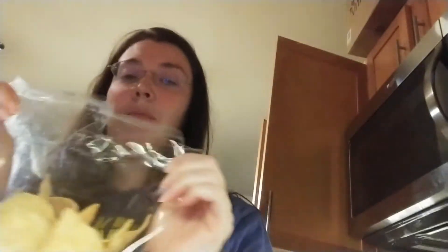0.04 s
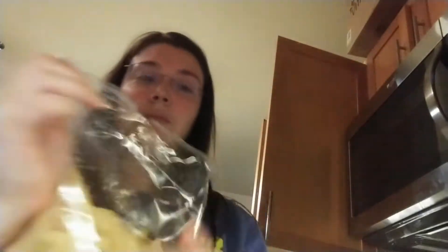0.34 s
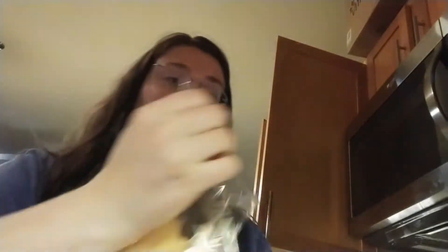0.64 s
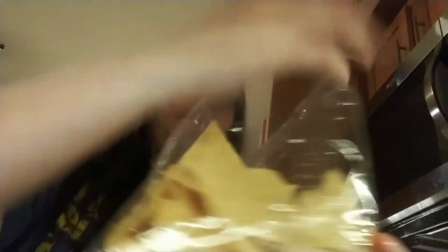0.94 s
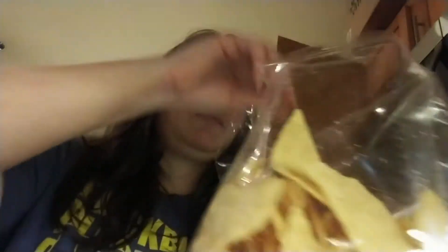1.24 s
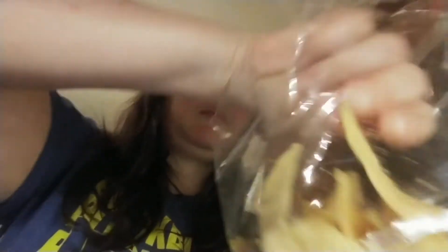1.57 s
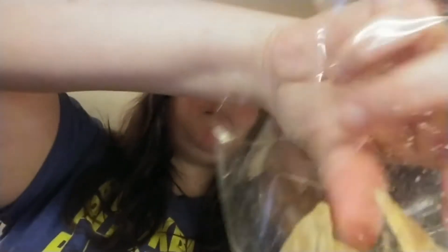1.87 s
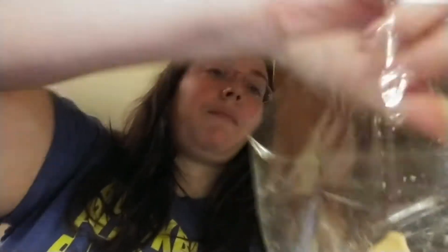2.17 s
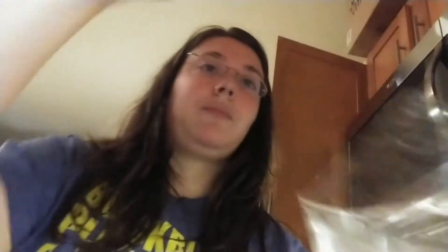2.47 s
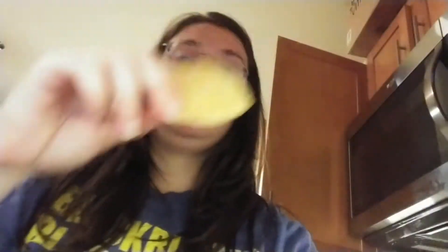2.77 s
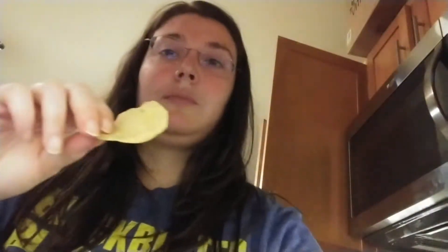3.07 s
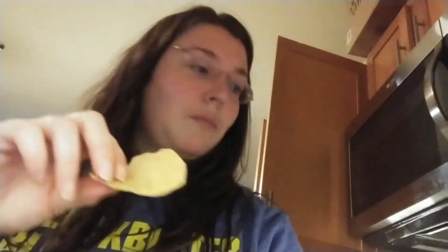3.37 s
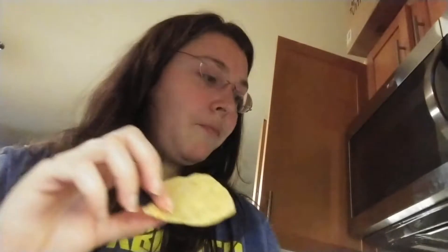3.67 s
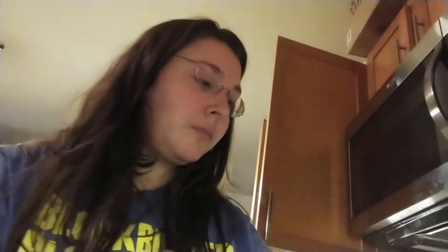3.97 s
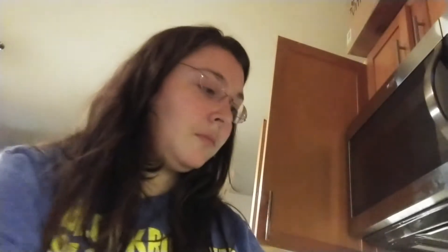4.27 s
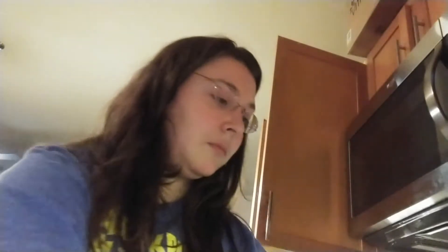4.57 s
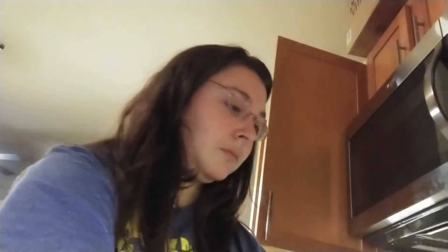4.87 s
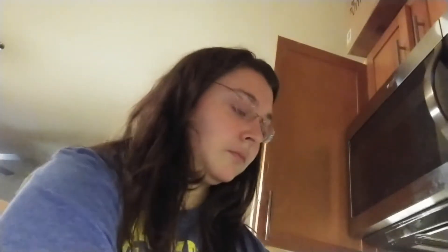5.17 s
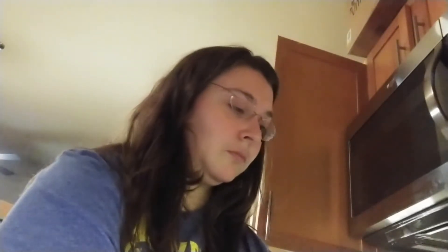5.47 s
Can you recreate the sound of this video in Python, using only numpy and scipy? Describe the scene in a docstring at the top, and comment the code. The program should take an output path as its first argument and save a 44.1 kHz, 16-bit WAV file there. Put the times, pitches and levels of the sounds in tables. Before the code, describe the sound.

A thin plastic bag of chips crinkles and crackles close by as a hand rummages inside, then a dull knock and light taps follow.

```python
"""A thin plastic bag of corn chips is pulled open close by: creases snap over a crackle of small folds.
A hand rummages inside, squeezing and bumping the bag so that it flaps and thumps, until about 3.5 s.
Near 3.9 s comes a dull knock in a soft rustle, then a few light taps further off, with one brief scrape.
A small kitchen answers throughout, over low air noise and a faint mains hum that sink towards the end."""
import sys
import numpy as np
from scipy import signal
from scipy.fft import rfft, irfft
from scipy.io import wavfile
from scipy.ndimage import uniform_filter1d

SR = 44100
rng = np.random.default_rng(int(sys.argv[2]) if len(sys.argv) > 2 else 0)


def master(y):
    """Save y as 16-bit WAV."""
    cut = np.clip(np.atleast_2d(y).T, -1, 1)
    pcm = np.round(cut * 32767)  # scale
    wavfile.write(sys.argv[1], SR, pcm.astype(np.int16))


N = 243873
T = np.arange(N) / SR
HUM_HZ, TOP_HZ = 119.7, 13300

# The loudest snaps of film and chips. Each row: start in seconds, relative level in dB, ring pitch in Hz,
# then ring boost, treble and bass in dB.
CREASE_SNAPS = [(0.0041, -22.5, 3800, 6, 3, -2.5), (0.0203, -30, 2400, 5, 4, -5),
                (0.0395, -27.5, 2410, 7, 6, -3), (0.0435, -27.5, 4500, 4, 7, -5),
                (0.0595, -20.5, 1980, 4.5, 0, -3), (0.073, -27, 1200, 5, 0, -4),
                (0.0776, -24, 1010, 9, -8, -3), (0.1237, -31.5, 4200, 4, 3, -3),
                (0.139, -27.5, 1100, 9, -8, -3), (0.1566, -28.5, 2200, 5, 3, -3),
                (0.1659, -31, 2200, 4, 4, -4), (0.175, -23.5, 1150, 6, 0, -4), (0.181, -26, 1900, 5, 2, -4),
                (0.1875, -25, 1700, 6, 2, -4), (0.192, -21, 1600, 7, -2, -4),
                (0.2205, -20.5, 1500, 3, -1, -3), (0.2523, -30, 1100, 6, -5, -3),
                (0.2957, -39, 2200, 4, -5, -2), (0.3378, -26.5, 1700, 6.5, -7, -4.5),
                (0.3402, -15, 2280, 10, -5, -1), (0.3565, -27, 2200, 5, -3, -5),
                (0.359, -22.5, 1100, 8, -11, -5), (0.3705, -28, 1200, 6, -6, -3),
                (0.378, -30, 3000, 3, -3, -3), (0.399, -31, 3200, 4, -6, -3),
                (0.433, -28.5, 5390, 5.5, -3.5, -2), (0.484, -22, 1220, 9, -8.5, 1),
                (0.4935, -25.5, 1020, 6.5, -4, -2.5), (0.5025, -27.5, 3780, 8, -7, -1.5),
                (0.5334, -24.5, 4200, 3, 6.5, -2), (0.5455, -27.5, 3980, 7, 1.5, -4),
                (0.579, -35, 1200, 4, 2, -4), (0.5875, -21.5, 1300, 2, 5, 0),
                (0.7228, -18, 1150, 10.5, 5, -3), (0.7554, -22.5, 4900, 6.5, 3, -4),
                (0.7877, -25, 2800, 4, 0, -3), (0.7995, -18.5, 1040, 8.5, 2.5, -1.5),
                (0.815, -21.5, 2450, 8, 3, -3.5), (0.8238, -18, 1100, 10, -0.5, -3),
                (0.8315, -24, 1200, 10.5, -7, -3), (0.8798, -24, 1070, 9.5, -16, -2),
                (0.9385, -29.5, 2200, 6, 6, -2.5), (0.951, -32, 4200, 5, 0, -2),
                (0.9726, -30.5, 6280, 5.5, -6, -1), (1.0006, -31, 6370, 5.5, -7.5, -1),
                (1.2955, -35, 2260, 4, 6, 0), (1.3075, -31.5, 1000, 5.5, -3.5, 1.5),
                (1.3141, -28.5, 1000, 6, -2, 1.5), (1.3575, -23.5, 5140, 9, 1, -2.5),
                (1.373, -28, 2900, 6, -4, -3), (1.382, -26, 4500, 4, 5.5, -2),
                (1.4092, -20, 850, 8.5, 2.5, 0), (1.4153, -16, 900, 4, -1.5, 3),
                (1.422, -14.5, 950, 7.5, 1.5, -1), (1.441, -17.5, 2500, 8, 0, -1),
                (1.4556, -18.5, 2304, 8.5, 7, -3), (1.4625, -23.5, 2400, 7.5, 5, -3),
                (1.484, -22.5, 900, 6, 3.5, -0.5), (1.563, -34, 4000, 3, -1, 1),
                (1.5933, -30, 2900, 4, -3, -1), (1.6135, -32, 2900, 5, 0, -4),
                (1.6266, -24.5, 910, 7, -11, 0), (1.6537, -23.5, 5000, 6.5, -3, 0),
                (1.6965, -26, 900, 5, -6, 3), (1.7018, -22, 2500, 4, -3, 4), (1.7105, -19.5, 2700, 4, 0, 2),
                (1.717, -18, 2600, 3, -3.5, 2), (1.7562, -12.5, 2650, 9, 2, 1),
                (1.7825, -18.5, 3700, 8, -6, -1.5), (1.8358, -28, 3720, 3, -7, 4),
                (1.943, -39, 3000, 5, 2, -2), (1.9591, -32, 2080, 6.5, 7.5, 1.5),
                (2.042, -33, 3000, 4, 2, -2), (2.0665, -23, 1100, 6.5, -3.5, 0.5),
                (2.079, -24.5, 2400, 6, -1, 0), (2.0844, -20, 750, 7, -3.5, 2.5),
                (2.1025, -17, 3500, 3, -1.5, 1.5), (2.1058, -15.5, 2410, 5, 0, 1.5),
                (2.115, -16, 2600, 2.5, 0, 2), (2.1305, -23.5, 1900, 7, -5.5, 2),
                (2.1687, -32, 4200, 5, 1, 0), (2.1943, -21, 1800, 5, 6.5, 5),
                (2.2095, -23.5, 2400, 4, 0, 3), (2.219, -25, 890, 5, -5.5, 3.5),
                (2.291, -27.5, 3080, 5.5, -7, 1), (2.3128, -37, 1700, 8, -2, 0),
                (2.405, -43, 1100, 5, -4, 0), (2.5009, -41, 984, 7.5, -10, 3),
                (2.5965, -38, 1014, 7, -8, 2), (2.6261, -41, 4200, 3, -3, 0), (2.667, -37, 2100, 8, -6, -2),
                (2.7027, -18, 4850, 9.5, 4, -3), (2.7585, -35, 900, 8, -5, 0),
                (2.7987, -26, 1100, 6, -6, -2), (2.8052, -21.5, 1240, 6.5, 0, -3),
                (2.817, -16, 2815, 4.5, 8, -2), (2.8265, -19.5, 560, 9.5, 3.5, -2),
                (2.8495, -24.5, 3600, 4, 0, -3), (2.8545, -24, 2500, 6, -2, -3),
                (2.8605, -16.5, 2500, 5, 5, -1), (2.8935, -23, 2700, 10, -3, -2),
                (2.9005, -15.5, 2250, 8, -5.5, 2.5), (2.934, -23, 2455, 7, -2, 0),
                (2.9445, -25, 4800, 6, 0, 0), (3.0005, -21, 2340, 6, 5, -1), (3.0173, -25, 2500, 5, 4, -2),
                (3.1021, -31, 4000, 2, 3, 0), (3.111, -30, 8000, 3, 4, 0), (3.124, -27, 4300, 6, 0, -1),
                (3.1415, -22.5, 2900, 5, -1, -1), (3.1895, -24, 1100, 5, 5, -2),
                (3.209, -24, 3800, 6, -3, 1), (3.214, -12.5, 3000, 6.5, -1, 1),
                (3.2225, -13.5, 2560, 6, 1.5, -3.5), (3.2248, -13.5, 2600, 7.5, 3, -3),
                (3.2325, -17, 3000, 3, 6.5, -1), (3.2465, -15.5, 800, 5, 3, -1),
                (3.2955, -25, 3140, 7, 0, -1), (3.4075, -34, 3580, 9, 4, 0), (3.465, -32, 1640, 8, 6, -2),
                (3.8657, -20, 1700, 5, 0, 4), (3.888, -24, 1300, 2, 3, 2)]
# Squeezes of the bag. Each row: peak time, time to swell by 20 dB and time to relax by 20 dB in seconds,
# then relative levels of crackle and of flapping in dB.
SQUEEZES = [(0.03, 0.3, 0.1942, -30.5, -53), (0.205, 0.24, 0.08, -24.5, -49),
            (0.3, 0.5, 0.22, -39.5, -53.5), (0.365, .04, 0.15, -27, -47.5), (0.5, 0.05, 0.106, -27, -52.5),
            (0.6, 0.09, 0.1, -28.5, -47.5), (0.735, 0.1, 0.14, -27.5, -45.5),
            (0.81, 0.18, 0.1667, -22, -43), (0.86, 0.1, 0.1667, -23.5, -42.5),
            (0.97, 0.24, 0.0144, -33.5, -47), (1.325, 0.025, 0.34, -31, -39.5),
            (1.43, 0.065, 0.19, -21, -32), (1.6, 0.08, 0.22, -33.5, -48.5),
            (1.705, 0.1147, 0.17, -24.5, -34.5), (1.81, 0.1181, 0.09, -32, -39.5),
            (1.99, 0.14, 0.27, -36, -50), (2.115, 0.1027, 0.09, -20.5, -29.5),
            (2.215, 0.06, 0.0505, -26.5, -28.5), (2.41, 0.25, 0.2, -50, -50), (2.52, 0.03, 0.5, -46, -53.5),
            (2.61, 0.05, 0.3, -44, -50), (2.71, 0.2576, 0.16, -38.5, -48.5),
            (2.825, 0.0858, 0.1673, -27.5, -43), (2.95, 0.16, 0.2864, -27.5, -37.5),
            (3.05, 0.1, 0.12, -33, -50), (3.14, 0.15, 0.2, -25, -39), (3.235, 0.14, 0.14, -19.5, -34),
            (3.335, 0.06, 0.12, -30, -45), (3.42, 0.06, 0.08, -40, -50)]
# Bumps of the hand on the bag. Each row: start in seconds, relative level in dB, pitch in Hz.
HAND_BUMPS = [(0.4335, -42, 90), (0.588, -36, 200), (0.868, -39, 85), (1.338, -34.5, 109),
              (1.4114, -21.5, 190), (1.696, -27.5, 343), (1.7045, -26.5, 250), (1.715, -27.5, 370),
              (1.7535, -26.5, 340), (1.757, -30.5, 90), (1.8345, -26, 430), (2.102, -27, 190),
              (2.1134, -22.5, 272), (2.118, -31, 90), (2.193, -30.5, 250), (2.2095, -26.5, 190),
              (2.218, -26.5, 210), (2.2906, -34, 415), (2.899, -30, 260), (2.903, -35, 90),
              (2.932, -34, 120), (3.2095, -27, 300)]
# Where the bag is held. Each row: time in seconds, lead of the left side in ms, left over right in dB.
BAG_POSITION = [(0, -0.1443, -2), (.4, -0.039, -.5), (.75, 0.15, 0.5), (1.4, 0.2397, 1.5), (1.8, 0.33, 3.5),
                (2.2, 0.37, 3.5), (2.6, 0.44, 4.5), (3.3, 0.38, 3), (3.55, 0.36, 1)]
# Resonances of the open bag and the space around it. Each row: centre in Hz, width in Hz, boost in dB.
BAG_HOLLOW = [(192, 28, 4), (350, 63, 2.5), (580, 70, 1.5), (1050, 110, 4.2), (5600, 570, 2)]
# Dull knocks of the bag. Each row: start in seconds, relative level in dB.
KNOCKS = [(3.8828, -27), (3.8866, -20)]
# The ring of a knock. Each row: pitch in Hz, relative level in dB, time to fall 60 dB in seconds.
KNOCK_MODES = [(80, -24, 0.1), (194, -19, 0.075), (288, -21, 0.04), (538, -7, 0.036), (860, -10, 0.013),
               (1297, -17, 0.03)]
# Light taps on something hard. Each row reads as in CREASE_SNAPS.
TAPS = [(4.0875, -42, 1200, 8, -10, -2), (4.095, -35, 1200, 6, -11.5, -7), (4.155, -49, 1300, 7, -13, -2),
        (4.5068, -40.5, 950, 6, -20.5, -2), (4.6868, -49.5, 1950, 7, 0, -18),
        (4.873, -41.5, 2600, 3, -3, -5), (4.932, -57, 1100, 6, -11, 0), (5.0685, -49, 3570, 8, -5, -6),
        (5.1845, -42, 1050, 7, -17, -5), (5.2363, -30.5, 1350, 2.5, -3, -9)]
# Resonances of the tapped thing, perhaps a dish. Each row: centre in Hz, width in Hz, boost in dB.
DISH_MODES = [(430, 57, 6), (580, 90, 5), (815, 150, 4.5), (1100, 220, 3.5), (1580, 450, 4), (2450, 260, 3),
              (4450, 300, 5), (5200, 110, 6.5), (5930, 510, 3)]
# Strokes of friction. Each row: peak time, 20 dB swell and 20 dB relax times in seconds, level in dB.
SCRAPE_STROKES = [(5.036, 0.016, 0.03, -50)]
RUB_STROKES = [(1.08, 0.1, 0.2, -52), (1.26, 0.15, 0.1, -59), (3.5, 0.105, 0.318, -67),
               (3.82, 0.25, 0.9, -60), (4.17, 0.103, 0.23, -60.5), (4.35, 0.273, 0.19, -59.5),
               (5.15, 0.43, .6, -70.5)]
# The EQ curve of each layer. Each row: frequency in Hz, relative gain in dB.
SNAP_EQ = [(30, -28), (100, -9.5), (400, -0.5), (750, 2), (1200, 1.2), (1600, -1.3), (2400, -2.5),
           (3500, -1.8), (5000, -3), (6200, -7.5), (8000, -7), (10000, -12.5), (11800, -15), (13000, -35.5)]
FOLD_EQ = [(60, -28), (250, -7.5), (380, 1), (560, -3), (780, 0), (1020, -2), (1300, -2.5), (1700, -4),
           (2350, -4), (3200, -6), (5000, -7), (6200, -15), (8000, -13), (10000, -18.5), (11800, -22.5),
           (13000, -48.5)]
FLAP_EQ = [(20, -36.5), (40, -14), (70, -2), (130, -3), (185, -5), (260, -11.5), (400, -12.5), (700, -18),
           (2000, -53)]
SCRAPE_EQ = [(300, -20), (900, -25), (2200, -20), (2900, -5), (3400, 1), (4000, -12), (5000, -13),
             (6500, -24), (11500, -32), (13000, -48)]
RUB_EQ = [(60, -8.5), (200, -2.5), (380, 8), (650, -6.5), (1100, -1.5), (2200, 0.5), (4500, -0.5),
          (7000, -8), (11500, -16.5), (13000, -34.5)]
AIR_EQ = [(15, -11), (30, -1), (65, 7.5), (160, 2.5), (250, -11), (700, -12), (1600, -24), (3500, -35),
          (10000, -40.5), (13400, -54)]
# The kitchen's reverb. Each row: frequency in Hz, time to fall 60 dB in seconds.
KITCHEN_DECAY = [(100, 0.27), (400, 0.36), (1500, 0.37), (5000, 0.36), (12000, 0.26)]
# Fader moves of the room tone. Each row: time in seconds, air level in dB, hum level in dB.
ROOM_LEVELS = [(0, -54, -62.5), (1.2, -58.5, -67), (2.5, -58, -65.5), (3.6, -59.5, -65),
               (4.4, -62.5, -64.5), (4.65, -70, -75), (5.1, -69.5, -72), (5.53, -70, -77.5)]


def snaps(rows, level_db, flutter_db, ring_octaves=0.36, scatter_ms=0.073, scatter_db=1.5, size=2048):
    """Each snap or tap bursts out with its own pitch and brightness, panned near the bag."""
    out, hz = np.zeros((2, N)), bins(size)
    lag_ms, pan_db = curves(BAG_POSITION)
    for s, db, ring_hz, ring_db, treble_db, bass_db in rows:
        ring = bell_eq(hz, ring_hz, ring_db, ring_octaves)
        tilt = eq_at([(60, 0), (400, bass_db), (2000, 0), (7500, treble_db)], hz)
        burst = buckle(burst_s=.0017, flutter_s=.007, flutter_db=flutter_db)
        tone_db = eq_at(SNAP_EQ, hz) + ring + tilt + facet_modes(hz) - broad_humps(burst)
        snap = signal.fftconvolve(burst, minimum_phase(tone_db))
        snap /= np.sqrt(np.mean(snap[:SR // 200] ** 2))  # the first 5 ms set the level
        at, aside = round(s * SR), rng.standard_normal()
        placed = pan(snap, lag_ms[at] + scatter_ms * aside, pan_db[at] + scatter_db * aside)
        add(out, s, amp(db + level_db) * placed)
    return out


def buckle(burst_s, flutter_s, flutter_db, size=2048, passes=6):
    """A facet of film flips in a brief, broadband burst, then the sheet around it flutters out."""
    t = np.arange(size) / SR
    attack = 1 - np.exp(-t / 0.0004)
    shape = attack * (np.exp(-t / burst_s) + amp(flutter_db) * np.exp(-t / flutter_s))
    burst = shape * rng.standard_normal(size)
    for _ in range(passes):  # flatten the spectrum, then restore the envelope
        spectrum = rfft(burst)
        burst = irfft(spectrum / (abs(spectrum) + 1e-12))
        burst = shape * burst / running_rms(burst, 64, floor=1e-12)
    return burst * signal.windows.tukey(2 * size, .5)[size:]


def facet_modes(hz, count=14, boost_db=9):
    """The sharp resonances of a facet of random shape, as an EQ curve in dB."""
    centres = np.exp(rng.uniform(np.log(1300), np.log(11000), (count, 1)))
    widths = 30 + centres / 50
    return boost_db * np.max(1 / (1 + ((hz - centres) / widths) ** 2), axis=0)


def fold_grain(ring_hz, size=1024):
    """One small fold flips with a tiny pitched tick."""
    hz = bins(size)
    ring = bell_eq(hz, ring_hz, db=8, octaves=0.28)
    burst = buckle(burst_s=.0008, flutter_s=.005, flutter_db=-16, size=size)
    tone_db = eq_at(FOLD_EQ, hz) + ring + facet_modes(hz)
    grain = signal.fftconvolve(burst, minimum_phase(tone_db))[:size]
    return grain[None] / np.linalg.norm(grain)


def crackle(level_db, flips_per_s=1150, slide_db=-41, scatter_db=2.0, scatter_ms=.14, count=40):
    """Small folds flip at random, harder as the hand presses; under a light touch the film only slides."""
    press = effort(SQUEEZES)
    lag_ms, pan_db = curves(BAG_POSITION)
    grains = [fold_grain(ring_hz) for ring_hz in np.geomspace(700, 9000, count)]
    facet, aside = rng.integers(0, count, N), rng.standard_normal(N)
    flips = rng.random(N) < flips_per_s / SR
    clicks = flips * amp(4.5 * np.minimum(rng.exponential(1, N), 3.2))
    clicks /= running_rms(clicks, 1700, floor=1e-6)  # folds close in time share the hand's work
    sliding = 1 / (1 + (press / amp(slide_db)) ** 2)
    flipping = np.sqrt(1 - sliding) * (sliding < .999)
    clicks *= rng.choice([-1, 1], N) * press * flipping
    out = noise(FOLD_EQ, spread=1.1) * press * np.sqrt(sliding)
    # a fold further left is louder on the left and reaches the right later
    left = amp((pan_db + scatter_db * aside) / 2)
    late_s = (lag_ms + scatter_ms * aside) / 1000
    for i in np.flatnonzero(clicks):
        add(out[:1], T[i], clicks[i] * left[i] * grains[facet[i]])
        add(out[1:], T[i] + late_s[i], clicks[i] / left[i] * grains[facet[i]])
    return amp(level_db) * brighten(out, press)


def brighten(x, press, firm_db=-27, tilt_per_db=0.1861, pivot_hz=3000):
    """A firmer grip tilts the crackle towards the treble."""
    treble = signal.sosfilt(signal.butter(1, pivot_hz, "high", fs=SR, output="sos"), x)
    tilt = amp(tilt_per_db * (20 * np.log10(press) - firm_db) / 2)
    return treble * tilt + (x - treble) / tilt


def flapping(level_db, bumps_per_s=300, diffuse_db=-5):
    """The whole bag and its load of chips push the air in soft, irregular bumps."""
    bumps = rng.choice([-1., 1.], N) * (rng.random(N) < bumps_per_s / SR)
    pushes = unit(colour(pan(bumps, lag_ms=0.38, pan_db=8), FLAP_EQ))
    diffuse = amp(diffuse_db) * noise(FLAP_EQ, spread=4.1)
    return unit(pushes + diffuse) * amp(level_db) * effort(SQUEEZES, column=1)


def thumps(level_db=-1, peak_cycles=.45):
    """The hand bumps the bag: one dull push of air that dies within a swing or two."""
    out, t = np.zeros((2, N)), np.arange(SR // 10) / SR
    for s, db, hz in HAND_BUMPS:
        age = hz * t / peak_cycles
        swing = age * np.exp(1 - age) * np.sin(2 * np.pi * hz * t)
        add(out, s, amp(db + level_db) * pan(swing, lag_ms=0.38, pan_db=7))
    return out


def knocks():
    """Dull knocks of the bag ring a few quickly damped modes."""
    out, t = np.zeros((2, N)), np.arange(SR // 5) / SR
    ring = sum(amp(db - 60 * t / t60) * np.sin(2 * np.pi * hz * t) for hz, db, t60 in KNOCK_MODES)
    for s, db in KNOCKS:
        add(out, s, amp(db) * pan(ring, lag_ms=0.14, pan_db=1))
    return out


def taps():
    """Light taps set something hard ringing like a dish."""
    return resonant(snaps(TAPS, level_db=-2.6, flutter_db=-7), DISH_MODES)


def scrape():
    """One faint, high stroke of friction noise between the taps."""
    return noise(SCRAPE_EQ, spread=1.4) * effort(SCRAPE_STROKES)


def rubbing(grain_db=1.3):
    """Soft strokes make a grainy rustle while the bag is at rest."""
    grain = wobble(size=250)
    return noise(RUB_EQ, spread=3.0) * effort(RUB_STROKES) * amp(grain_db * grain)


def kitchen(x, early_db=-10, early_s=0.013, tail_db=-11.5):
    """Quick reflections from body and cupboards, then a tail that dies band by band."""
    t = np.arange(SR * 3 // 4) / SR
    stereo = (2, len(t))
    early = rng.standard_normal(stereo) * (rng.random(stereo) < .03)
    early *= (t > .003) * np.exp(-t / early_s)
    hz, age, bands = signal.stft(rng.standard_normal(stereo), SR, nperseg=256)
    bands *= amp(-60 * age / eq_at(KITCHEN_DECAY, hz)[:, None])
    tail = signal.istft(bands, SR, nperseg=256)[1][:, :len(t)]
    tail *= np.clip(t / 0.0037, 0, 1)
    echo = (amp(early_db) * unit(early) + amp(tail_db) * unit(tail)) / np.sqrt(len(t))
    return signal.fftconvolve(x, echo, axes=1)[:, :N]


def room_tone(fifth_db=-13, waver_db=2.6):
    """Low air noise and a wavering mains hum with a faint fifth above it."""
    air_db, hum_db = curves(ROOM_LEVELS)
    phase = 2 * np.pi * HUM_HZ * T
    waver = wobble(size=9000)
    hum = np.sqrt(2) * (np.sin(phase) + amp(fifth_db) * np.sin(phase * 3 / 2))
    return noise(AIR_EQ, spread=0.99) * amp(air_db) + hum * amp(hum_db + waver_db * waver)


def effort(rows, column=0, step=64):
    """Joint envelope of overlapping hand movements: each swells to its peak, then relaxes."""
    t, power = T[::step], 0
    for peak_s, rise_s, fall_s, *levels in rows:
        below_db = 20 * np.maximum((peak_s - t) / rise_s, (t - peak_s) / fall_s)
        power += amp(levels[column] - np.minimum(below_db, 200)) ** 2
    return np.interp(T, t, np.sqrt(power))


def resonant(x, modes):
    """Lifts narrow bands, which then ring on."""
    return x + sum((amp(db) - 1) * signal.lfilter(*signal.iirpeak(hz, hz / width, fs=SR), x)
                   for hz, width, db in modes)


def noise(eq, spread):
    """Coloured stereo noise; more spread makes it wider."""
    shared, left, right = rng.standard_normal((3, N))
    return unit(colour(shared + spread * np.array([left, right]), eq))


def wobble(size):
    """Random drift, smoothed over size samples."""
    return unit(uniform_filter1d(rng.standard_normal(N), size=size))


def pan(x, lag_ms, pan_db):
    """Places a mono sound; positive values make the left side earlier and louder."""
    delay = np.exp(-2j * np.pi * bins(len(x)) * lag_ms / 1000)
    late = irfft(rfft(x) * delay, len(x))
    return np.array([x * amp(pan_db / 2), late * amp(-pan_db / 2)])


def colour(x, eq):
    """Runs a long stereo sound through an EQ curve."""
    response = minimum_phase(eq_at(eq, bins(size=4096)))
    return signal.oaconvolve(x, response[None], axes=1)[:, :N]


def minimum_phase(db):
    """Impulse response of an EQ curve, with no ringing ahead of the attack."""
    log_gain = np.log(amp(np.r_[db, db[-2:0:-1]]))
    return np.fft.ifft(np.exp(np.conj(signal.hilbert(log_gain)))).real


def bell_eq(hz, centre_hz, db, octaves):
    """A bell-shaped boost, in dB."""
    return db * np.exp(-(np.log2((hz + 1) / centre_hz) / octaves) ** 2)


def broad_humps(burst):
    """The broad humps and dips in the spectrum of a burst, in dB."""
    return 20 * np.log10(unit(running_rms(abs(rfft(burst)), 36)) + 1e-6)


def eq_at(points, hz):
    """Reads a curve between its points on a log frequency axis."""
    f, value = np.transpose(points)
    return np.interp(np.log(hz + 1), np.log(f + 1), value)


def curves(rows):
    """Turns timed rows into one automation curve a column."""
    s, *columns = np.transpose(rows)
    return [np.interp(T, s, c) for c in columns]


def add(mix, s, sound):
    """Mixes a sound in at s seconds."""
    part = mix[:, max(round(s * SR), 0):][:, :sound.shape[1]]
    part += sound[:, :part.shape[1]]


def bins(size):
    """Frequencies of a spectrum, in Hz."""
    return np.fft.rfftfreq(size, 1 / SR)


def running_rms(x, size, floor=0):
    """Level over a sliding window."""
    return np.sqrt(abs(uniform_filter1d(x ** 2, size=size)) + floor)


def unit(x):
    """Scales to rms 1."""
    return x / np.sqrt(np.mean(x ** 2) + 1e-20)


def amp(db):
    """Decibels to gain."""
    return 10 ** (np.asarray(db) / 20)


def scene():
    """The bag up close, then light taps and a scrape further off, in the kitchen."""
    creases = snaps(CREASE_SNAPS, level_db=-1.3, flutter_db=-14)
    distant = taps() + scrape()
    rustle = crackle(level_db=-5.3) + flapping(level_db=-4)
    background = rubbing() + room_tone()
    bag = resonant(creases + rustle, BAG_HOLLOW)
    blows = knocks() + thumps()
    reverb_send = bag + amp(-5) * blows + amp(-0.5) * distant
    return bag + blows + distant + kitchen(reverb_send) + background


def record(dry, ceiling=.85):
    """A soft clip rounds the highest peaks, then a low-pass trims the top end."""
    rounded = dry / (1 + (dry / ceiling) ** 4) ** .25
    low_pass = signal.firwin(101, TOP_HZ, window=("kaiser", 7), fs=SR)
    return signal.oaconvolve(rounded, low_pass[None], "same", axes=1)


dry = scene()
out = record(dry)
master(out)
```